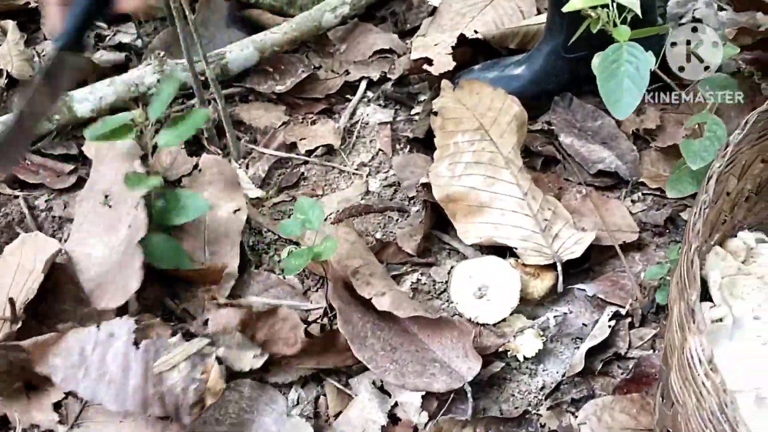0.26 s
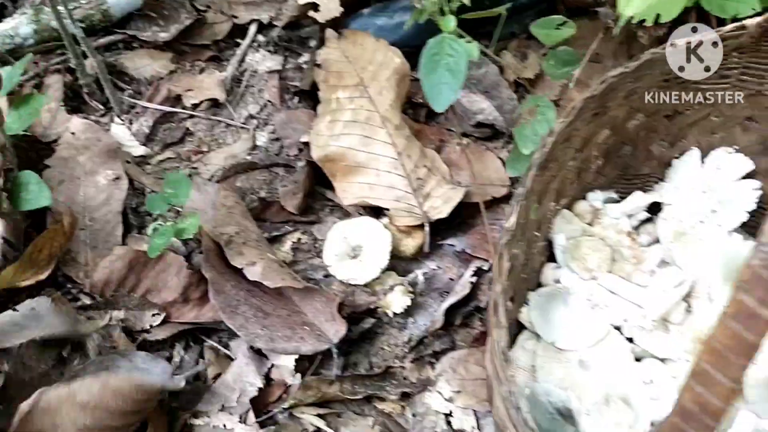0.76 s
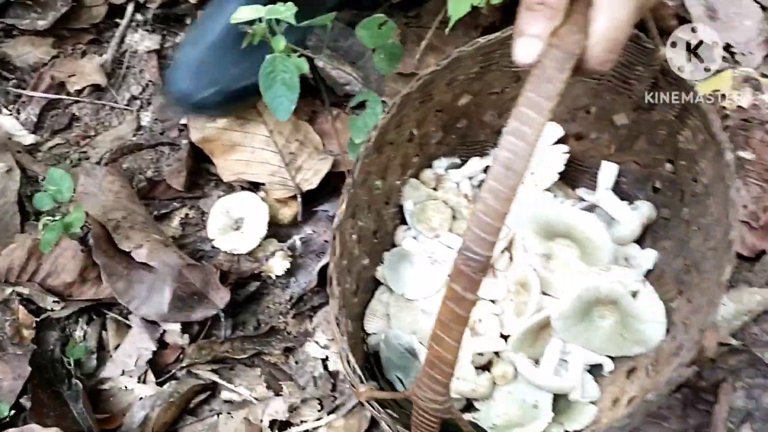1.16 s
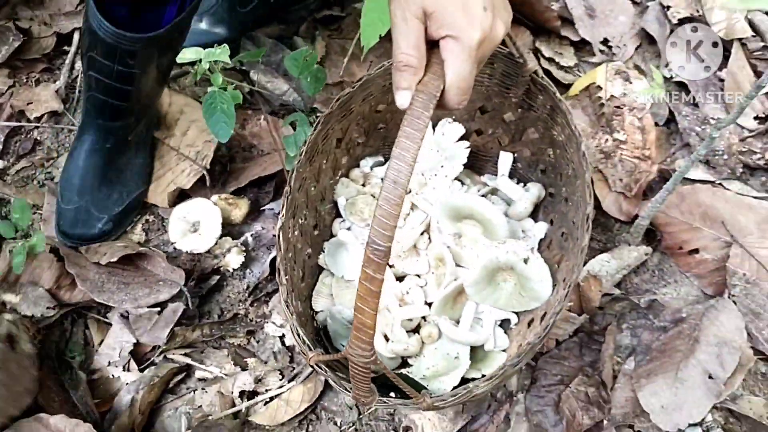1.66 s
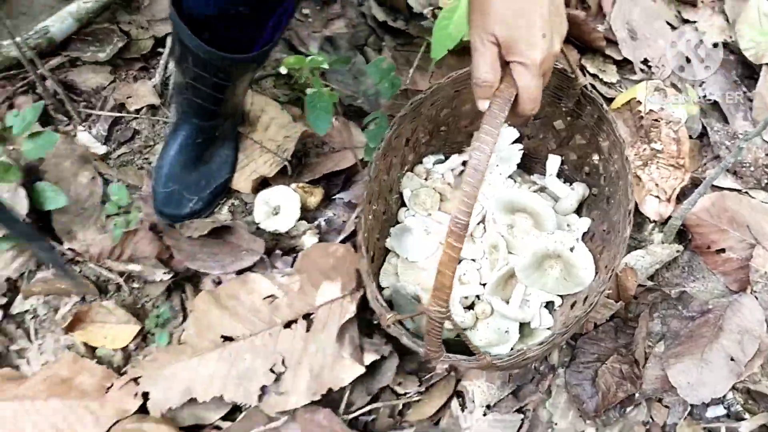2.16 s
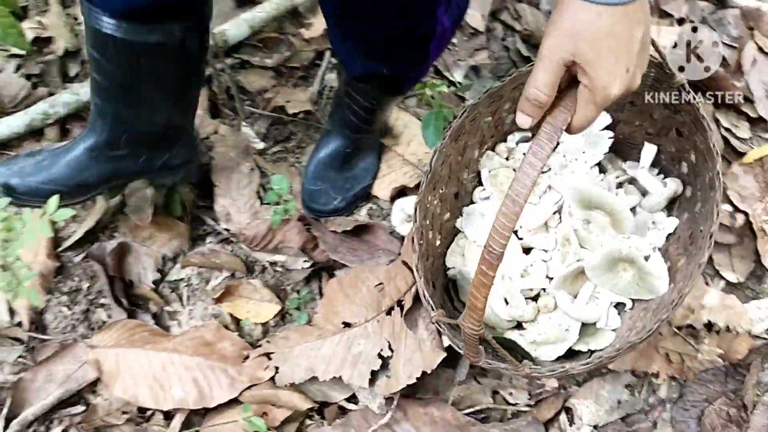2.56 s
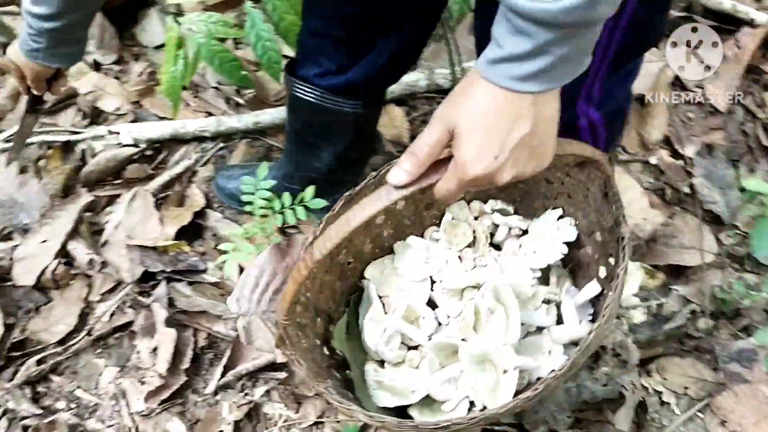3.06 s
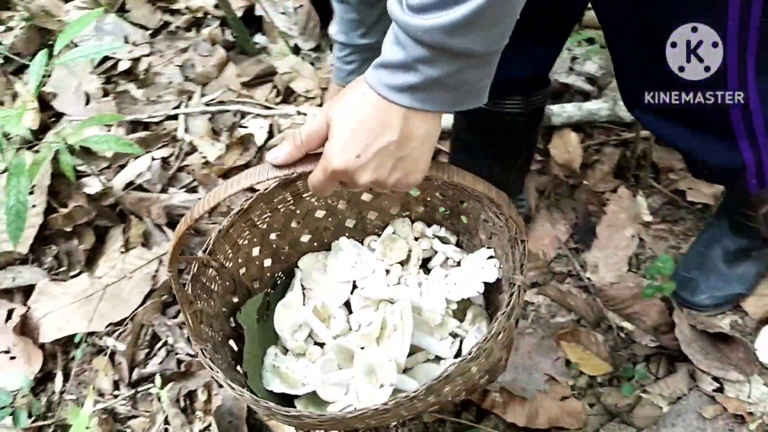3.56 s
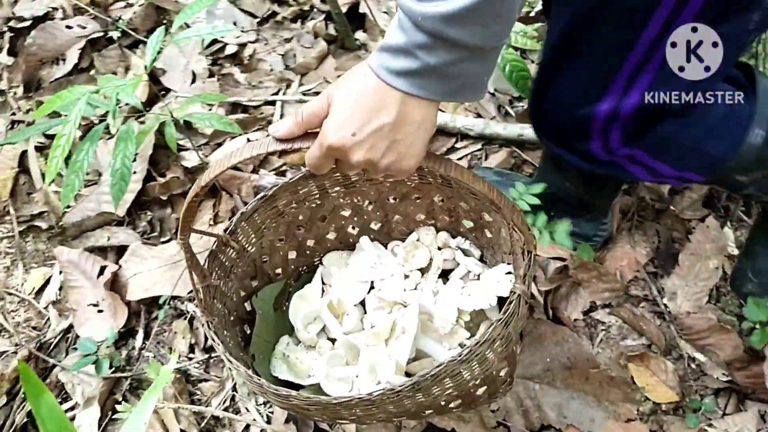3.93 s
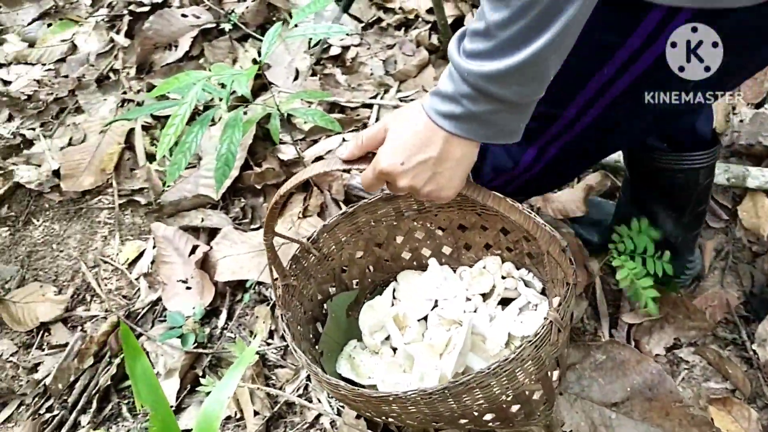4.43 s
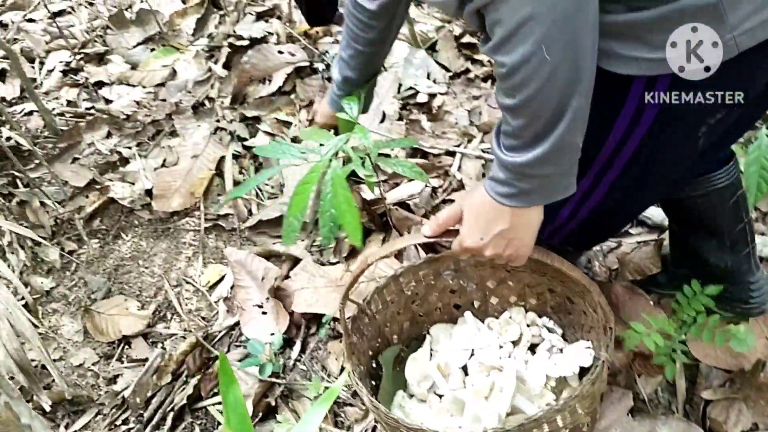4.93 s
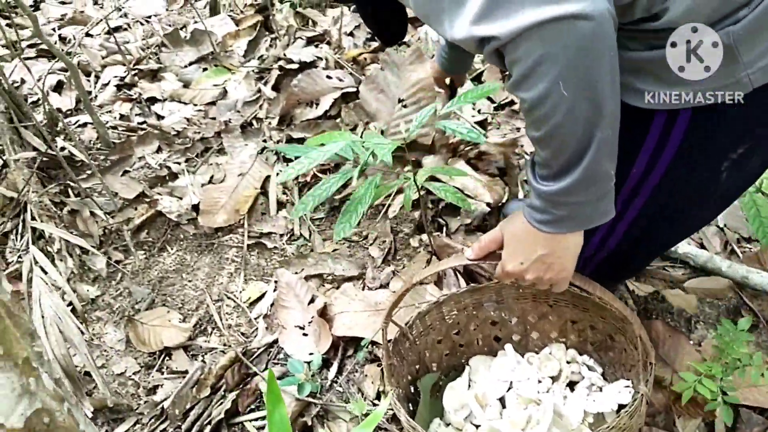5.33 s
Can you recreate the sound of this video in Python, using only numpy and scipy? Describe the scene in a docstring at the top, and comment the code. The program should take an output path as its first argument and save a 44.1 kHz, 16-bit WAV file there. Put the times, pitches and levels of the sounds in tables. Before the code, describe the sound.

Very near a handheld stereo microphone outdoors, a blade pushes through dry leaf litter in irregular bursts, densest around one second, with brittle crackle, scrapes and stalk snaps. A loud single snap comes near three seconds. Lighter rustles follow. High cicadas hiss behind, dropping later as a thin insect whistle grows clearer.

```python
"""A blade sweeps and digs through dry leaf litter, near and wandering between the ears. Each push sums damped
leaf fractures and shaped noise into crunch, tearing, pressed litter and crisp edges. Stalks snap as decaying
sines with noise splinters; scrapes are noise ringing around a gliding pitch. Behind it shaped noise makes a
cicada chorus and a faint forest murmur, and two insects whistle sine tones. The carried camera adds low
shudders, low bumps come from the camera and the heavier snaps, and the digging gets a short forest scatter."""
import sys
import numpy as np
from scipy import signal
from scipy.fft import rfft, irfft, next_fast_len
from scipy.io import wavfile
from scipy.ndimage import uniform_filter1d, map_coordinates

SR = 44100
rng = np.random.default_rng(int(sys.argv[2]) if len(sys.argv) > 2 else 0)


def master_out(mix):
    """Clip the mix to full scale and print it as 16-bit PCM to the path in sys.argv[1]."""
    frames = np.transpose(np.atleast_2d(mix))
    ceiling = np.clip(frames, -1, 1)
    pcm = np.round(ceiling * 32767).astype(np.int16)
    wavfile.write(sys.argv[1], SR, pcm)


N = 246413  # length in samples


def amp(db):
    """Decibels to gain."""
    return 10 ** (np.asarray(db) / 20)


def unit(x):
    """Scale to rms 1."""
    return x / np.sqrt(np.mean(x ** 2) + 1e-20)


def along(points, hz):
    """Read (f/Hz, value) points on a log frequency axis."""
    f, v = np.transpose(points)
    return np.interp(np.log(hz + 1), np.log(f), v)


def curves(rows):
    """One automation curve, a value per sample, for each column after the time."""
    s, *cols = np.transpose(rows)
    return [np.interp(np.arange(N) / SR, s, c) for c in cols]


def wobble(rate):
    """A smooth random curve with rate knots a second."""
    knots = rng.standard_normal(int(N * rate / SR) + 4)
    return map_coordinates(knots, [np.arange(N) * rate / SR])


def panned(db, pan_db):
    """Left and right gains around a level, pan_db apart."""
    return amp(db + np.array([[pan_db], [-pan_db]]) / 2)


def noise():
    """Two unrelated channels of white noise."""
    return rng.standard_normal((2, N))


def filtered(x, response):
    """Multiply the spectrum of x by a response of frequency."""
    m = next_fast_len(N + SR // 4)
    return irfft(rfft(x, m) * response(np.fft.rfftfreq(m, 1 / SR)), m)[..., :N]


def coloured(pair, spectrum, alike):
    """Two unrelated signals become a stereo sound of rms 1 with this spectrum and left-right likeness."""
    def mid_side(hz):
        turn = np.arccos(np.clip(along(alike, hz), -1, 1)) / 2
        return amp(along(spectrum, hz)) * [np.cos(turn), np.sin(turn)]
    mid, side = filtered(pair, mid_side)
    return unit(np.array([mid + side, mid - side]))


# colour of the forest murmur: f/Hz, relative level/dB per Hz
MURMUR_SPECTRUM = [(25, -16), (200, -7), (800, -3), (2000, 0), (6000, -28)]
MURMUR_DB = -68


def forest_murmur():
    """Faint steady noise, the air of the still forest."""
    return amp(MURMUR_DB) * coloured(noise(), MURMUR_SPECTRUM, LITTER_LIKENESS)


# chorus fader, before a fixed trim: t/s, level/dB
CHORUS_LEVEL = [(0, -39), (1.2, -38), (3.44, -37.5), (3.75, -45.5), (4.6, -47.5), (5.1, -53.5), (5.59, -50)]
# colour of the chorus ahead: f/Hz, relative level/dB per Hz
CICADA_SPECTRUM = [(2500, -50), (3600, -22), (4000, -5), (4300, 4), (4850, 0), (5500, 4), (6400, -5),
                   (7300, -4.5), (8500, 2), (9400, 0), (10300, -23.5), (15500, -13)]
# equaliser for the chorus off to the side: f/Hz, gain/dB
CHORUS_ASIDE = [(4000, -7), (5900, 5.5), (6700, -11), (7600, 1), (9400, 0.5), (10500, -9), (15500, -4)]
TURN_S, TURN_LENGTH_S = 3.4, 0.35  # the camera turns away from the chorus


def cicadas():
    """Many far cicadas merge into a hiss that fades and changes colour as the camera turns."""
    chorus_db, = curves(CHORUS_LEVEL)
    ahead = coloured(noise(), CICADA_SPECTRUM, [(4000, 0.0016), (9000, 0)])
    aside = filtered(ahead, lambda hz: amp(along(CHORUS_ASIDE, hz)))
    turn = np.clip((np.arange(N) / SR - TURN_S) / TURN_LENGTH_S, 0, 1)
    level = amp(chorus_db + 2.0 + wobble(24.94))
    return level * (ahead + turn * (aside - ahead))


WHISTLE_ROUGH_DB = 2.2  # depth of the random level flutter of both whistling insects
# the farther insect's single swell: start t/s, length t/s, level/dB before the swell, pitch f/Hz
FAR_SWELL = (2.95, .6, -48.5, 4253)


def far_whistle():
    """A farther insect, pitched a little higher, swells once out of the chorus and sinks back."""
    start, length, db, hz = FAR_SWELL
    t = np.arange(N) / SR
    swell = np.sin(np.pi * np.clip((t - start) / length, 0, 1))
    tone = np.array([np.sin(2 * np.pi * hz * t + .6 * wobble(25)) for ear in range(2)])
    return amp(db) * swell * unit(tone * amp(WHISTLE_ROUGH_DB * wobble(60)))


# swells of the held whistle: start t/s, length t/s, level/dB before a fixed trim, left minus right level/dB
WHISTLE_SWELLS = [(0.235, 0.14, -43, 2), (1.15, .12, -52, -2), (1.3, .11, -51, 2), (1.64, 0.07, -42, 3),
                  (2.06, .12, -47, -3), (2.25, .2, -42, 5), (2.57, .2, -47.5, 0),
                  (2.975, 0.065, -44.5, -12), (3.05, 0.13, -44.5, -14), (3.16, 0.125, -42.5, 4),
                  (3.52, .1, -48, 4), (3.805, 0.11, -42.5, -9), (3.95, 0.11, -40.5, -7),
                  (4.035, 0.115, -40.5, -10), (4.125, 0.125, -41, -8), (4.255, 0.05, -42, 0),
                  (4.31, 0.03, -46, 6), (4.41, 0.075, -40.5, -3), (4.51, 0.095, -43.5, -4),
                  (4.645, 0.125, -41, -6), (4.772, 0.058, -42, -6), (4.865, 0.06, -48, -9),
                  (4.945, 0.135, -42, -2), (5.06, 0.09, -40, -4), (5.13, 0.125, -38, -5),
                  (5.23, .12, -37, -5), (5.335, .09, -39.5, -6), (5.44, 0.14, -42.5, -3)]
WHISTLE_HZ, WHISTLE_DRIFT_HZ = 3893, 7
WHISTLE_TRIM_DB = -5.0
WHISTLE_FLOOR_DB = -52  # the level that the held tone fades to between swells, before the trim


def whistle():
    """One insect holds a continuous whistle that swells and fades, drifting in pitch and fluttering in level."""
    gain = np.full((2, N + SR), amp(WHISTLE_FLOOR_DB))
    for start, length, db, pan_db in WHISTLE_SWELLS:
        a, n = round(start * SR), round(length * SR)
        gain[:, a:a + n] += panned(db, pan_db) * signal.windows.tukey(n, .5)
    pitch_hz = WHISTLE_HZ + WHISTLE_DRIFT_HZ * wobble(3) + 9 * wobble(90)
    phase = 2 * np.pi * np.cumsum(pitch_hz) / SR
    # paths through the trees shift the whistle differently at each ear
    tone = np.array([np.sin(phase + .4 * wobble(8)) for ear in range(2)])
    fluttering = unit(tone * amp(WHISTLE_ROUGH_DB * wobble(110)))
    return gain[:, :N] * amp(WHISTLE_TRIM_DB) * fluttering


# colour of the shudder: f/Hz, relative level/dB per Hz
SHUDDER_SPECTRUM = [(20, -23), (45, -17), (80, 2), (115, 5), (200, -12), (600, -27), (2000, -50)]
# low bumps, some from the carried camera, some the body thuds of heavier snapping stalks: t/s, nominal
# level/dB, pitch f/Hz
BUMPS = [(.09, -49, 140), (.64, -46, 110), (0.919, -32, 129), (2.32, -47, 85), (2.44, -56, 90),
         (2.92, -46, 90), (3.02, -53, 85), (3.73, -50, 85), (4.137, -44, 115), (4.24, -43, 105),
         (4.303, -37, 110), (4.395, -39, 115), (4.475, -38, 108), (4.511, -44, 105), (5.389, -41, 111)]
RUMBLE_DB, SHAKE_DB = -74.5, -58  # nominal steady rumble; ground shake relative to the crunch gain


def handling(effort):
    """Dull shudders that grow with the digging, and decaying low bumps, both stronger on the right."""
    rumble = (amp(RUMBLE_DB) + amp(SHAKE_DB) * effort) * amp(2.3 * wobble(6.6))
    t = np.arange(SR // 6) / SR
    knocks, jolts = np.zeros((2, N + SR))
    for s, db, hz in BUMPS:
        start = round(s * SR)
        blow = amp(db) * (1 - np.exp(-t / 0.0086))
        knocks[start:][:len(t)] += blow * amp(2 - 60 * t / 0.068) * np.sin(2 * np.pi * hz * t)
        jolts[start:][:len(t)] += blow * amp(-12.5 - 60 * t / 0.16)
    shudder = (rumble + jolts[:N]) * coloured(noise(), SHUDDER_SPECTRUM, [(50, .1), (150, 0.2)])
    bumps = signal.sosfilt(signal.butter(2, 75, "high", fs=SR, output="sos"), knocks[:N])
    return shudder * amp([[-4], [2.5]]) + bumps * amp([[-1.5], [1.5]])


# decay of the forest scatter: f/Hz, t60 t/s
FOREST_DECAY = [(200, 0.055), (2000, 0.19), (12000, 0.052)]


def forest_scatter(x):
    """Trunks and ground answer with a short noise tail whose decay time depends on frequency."""
    hz, t, z = signal.stft(rng.standard_normal((2, SR // 4)), SR, nperseg=256)
    decay = amp(-60 * t / along(FOREST_DECAY, hz)[:, None])
    tail = signal.istft(z * decay, SR, nperseg=256)[1]
    return signal.fftconvolve(x, tail / np.linalg.norm(tail[0]), axes=1)[:, :N]


def turned(pair, delay_ms):
    """A sound off to one side reaches one ear earlier than the other."""
    n = np.arange(N)
    shift = delay_ms * SR / 2000  # half the delay in samples, later at the left and earlier at the right
    return np.array([map_coordinates(x, [n + side * shift], order=3) for x, side in zip(pair, (-1, 1))])


# the blade rubs along soil and stiff leaves:
# start t/s, end t/s, level/dB before the fades, first resonance f/Hz, last resonance f/Hz, width f/Hz
SCRAPE_GLIDES = [(0.04, 0.2, -42, 1400, 1200, 350), (0.83, 0.93, -37, 3600, 4200, 900),
                 (0.525, 0.69, -40, 760, 670, 200), (0.53, 0.66, -40, 2120, 2010, 260),
                 (0.65, 0.75, -35.5, 2030, 1920, 260), (0.62, 0.73, -39, 3750, 3350, 600),
                 (1.503, 1.76, -40, 2300, 2100, 400), (1.82, 2.0, -45, 1350, 1100, 300),
                 (3.555, 3.824, -42, 1080, 980, 300), (4.909, 5.243, -48, 780, 690, 222)]


def scrapes():
    """While the blade slides, its chatter excites one broad resonance that drifts as the contact moves."""
    out = np.zeros((2, N))
    for start, end, db, first_hz, last_hz, width_hz in SCRAPE_GLIDES:
        a, b = round(start * SR), min(round(end * SR), N)
        push = rng.standard_normal((3, b - a)) + 1j * rng.standard_normal((3, b - a))
        lowpass = signal.butter(2, width_hz / 2, fs=SR, output="sos")
        # one stream is common to both ears, one more belongs to each ear
        chatter = signal.sosfilt(lowpass, push[0] + 0.49 * push[1:])
        glide_hz = np.linspace(first_hz, last_hz, b - a)
        ring = np.real(chatter * np.exp(2j * np.pi * np.cumsum(glide_hz) / SR))
        out[:, a:b] += amp(db) * unit(ring) * signal.windows.tukey(b - a, .35)
    return out


# snapping stalks and twigs: t/s, nominal level/dB, pitch f/Hz, left minus right level/dB,
# ring t60 t/s, splinter level/dB relative to the snap before its colour
STALK_SNAPS = [(.142, -20, 1150, 0, .016, -12), (.216, -19, 980, -1, .01, -11),
               (.237, -20, 912, 0, .014, -12), (.472, -26, 1800, 1, .016, -11),
               (.516, -23, 654, 0, .016, -11), (.723, -13, 1900, 3, .012, -9),
               (.736, -10.5, 900, 0, .006, -6), (.801, -13, 1300, -1, .014, -10),
               (.842, -11.5, 2400, 0, .005, -7), (.848, -14, 1010, 1, .01, -10),
               (.859, -15, 3400, 0, .007, -8), (.876, -10.5, 3200, 1, .007, -6),
               (.8995, -8, 1090, 0, .009, -12), (.922, -9, 1190, 1, .014, -9),
               (.9232, -11.5, 2350, 0, .018, -8), (.931, -17, 1300, 0, .007, -9),
               (.973, -15, 1000, 0, .018, -18), (1.125, -28, 1200, 0, .008, -7),
               (1.289, -25, 1270, 1, .014, -9), (1.424, -19, 1400, 0, .02, -9),
               (1.486, -14, 1700, 1, .009, -6), (1.594, -20, 2000, 2, .008, -11),
               (1.618, -20, 2160, 1, .01, -11), (1.831, -16, 1280, 1, .02, -14),
               (1.87, -19, 1310, 0, .012, -9), (2.856, 0.5, 1950, 3, .0042, -9),
               (2.8585, -17, 1400, 1, .009, -14), (3.241, -23, 4260, -2, .02, -12),
               (3.495, -21, 1000, 3, .01, -10), (3.641, -16, 1080, 1, .018, -13),
               (3.824, -24, 1900, 1, .014, -8), (3.924, -26, 1170, 1, .01, -10),
               (4.104, -31, 1800, 1, .008, -8), (4.281, -24, 1100, 1, .014, -12),
               (4.374, -25, 1100, 1, .018, -15), (4.3835, -16, 2200, 4, .013, -9),
               (4.4045, -11.5, 1900, 0, .012, -9), (4.454, -26, 3900, 1, .006, -6),
               (4.49, -20.5, 1400, 3, .006, -13), (4.498, -8.5, 1850, 5, .0105, -20),
               (4.524, -15, 1500, 1, .011, -7), (4.538, -24, 915, 4, .02, -20),
               (4.565, -24, 1840, 3, .012, -13), (4.597, -27, 1327, 2, .018, -9),
               (4.615, -18, 1250, 2, .014, -7), (4.622, -21, 2000, 0, .012, -8),
               (4.729, -18, 2070, 3, .012, -7), (4.7485, -14, 4150, 3, .009, -5),
               (4.7495, -19, 1900, 2, .008, -12), (4.757, -12.5, 2100, 1, .009, -7),
               (4.764, -23, 1500, 1, .01, -10), (4.779, -25, 2600, 0, .007, -5),
               (4.825, -28, 1560, 2, .007, -9), (4.877, -32, 2050, 1, .016, -16)]
# equaliser for the splinters: f/Hz, gain/dB
SPLINTER_COLOUR = [(100, -35), (600, -16), (1500, 2), (4200, 2), (5400, -4), (6700, -13.5), (8600, 3.5),
                   (11000, -9.5), (15500, -14)]
SECOND_MODE, SECOND_MODE_DB = 1.46, -13  # a stalk's upper ring: ratio to its pitch, relative level
RATTLE_DB = -13  # the leaf that the stalk rattles, relative to the snap


def snaps():
    """A stalk gives way with a sharp pop and a spray of splinters, and rattles the leaf that lies on it."""
    pops, sprays = np.zeros((2, 2, N + SR))
    t = np.arange(SR // 12) / SR
    rise = 1 - np.exp(-t / 0.00025)
    for s, db, hz, pan_db, t60, splinter_db in STALK_SNAPS:
        gain = panned(db, pan_db) * rise
        swing = 2 * np.pi * hz * t + rng.normal(0, 0.45, (2, 1))  # a random phase at each ear
        modes = np.sin(swing) + amp(SECOND_MODE_DB) * np.sin(SECOND_MODE * swing)
        pop = modes * amp(-60 * t / t60)
        band = signal.butter(2, [hz * 0.2, min(hz * 2, SR / 3)], "band", fs=SR, output="sos")
        leaf = unit(signal.sosfilt(band, rng.standard_normal((2, len(t)))))
        # the leaf takes a millisecond or two to start rattling
        rattle = (1 - np.exp(-t / 0.0019)) * leaf * amp(-60 * t / (t60 + 0.0051))
        spray = rng.standard_normal((2, len(t))) * amp(splinter_db - 60 * t / (1.6 * t60))
        start = round(s * SR)
        pops[:, start:start + len(t)] += gain * (pop + amp(RATTLE_DB) * rattle)
        sprays[:, start:start + len(t)] += gain * spray
    # thin stalks radiate no bass
    thin = signal.sosfilt(signal.butter(2, 350, "high", fs=SR, output="sos"), pops[:, :N])
    return thin + filtered(sprays[:, :N], lambda hz: amp(along(SPLINTER_COLOUR, hz)))


def crackles(rate, pitch_hz, spread, cycles, scatter_db, rub_db, size=160):
    """Two streams of tiny leaf fractures, each a short damped ring, over the noise of leaves rubbing."""
    count = int(rate * N / SR)  # rate is in fractures a second
    when, strength, angle, chance = rng.random((count, 4)).T
    hz = np.clip(pitch_hz * np.exp(spread * (2 * chance - 1)), 100, SR / 2.2)
    turns = hz[:, None] * np.arange(size) / SR
    # most fractures are weak, a few are strong
    force = amp(-scatter_db * np.log(1 - .985 * strength)) * np.sqrt(hz)
    rings = force[:, None] * np.sin(2 * np.pi * turns) * np.exp(-turns / cycles)
    index = ((when * N).astype(int)[:, None] + np.arange(size)).ravel()
    pair = []
    for way in (np.cos, np.sin):
        share = way(2 * np.pi * angle)[:, None]
        pair.append(np.bincount(index, (rings * share).ravel(), N)[:N])
    # above its own pitch a fracture still carries a sharp edge
    edged = filtered(np.array(pair), lambda hz: np.sqrt(hz / pitch_hz))
    return unit(unit(edged) + amp(rub_db) * noise())


LEAF_COLOUR_DB, LEAF_WIDTH_HZ, LEAF_CONTACT_S = 1.9, 300, .05  # rms tint; smoothing over pitch and time


def leaf_by_leaf(pair):
    """Each leaf that the blade passes lends its own broad resonances, so the colour keeps shifting."""
    hz, t, z = signal.stft(pair, SR, nperseg=512)
    field = rng.standard_normal(z.shape[1:])
    for _ in range(2):
        field = uniform_filter1d(field, round(LEAF_WIDTH_HZ / hz[1]), axis=0)
        field = uniform_filter1d(field, round(LEAF_CONTACT_S / t[1]), axis=1)
    tint = unit(amp(LEAF_COLOUR_DB * unit(field)))
    return signal.istft(z * tint, SR, nperseg=512)[1][:, :N]


# pushes through the litter: start t/s, length t/s, nominal crunch level/dB halfway,
# swell over the push level/dB, then relative to the crunch: tearing level/dB, pressed litter level/dB,
# crisp edges level/dB; initial settling level/dB per s, delay of the left ear t/ms
PUSHES = [(-.01, 0.14, -36, 5.5, 1.5, -10.5, -14, 92, 0.21),
          (0.16, 0.075, -41.5, -2, 4.5, -8, -16, 74, 0.18), (0.309, 0.15, -43, 2, 2, -14.5, -12, 74, 0.17),
          (0.509, 0.078, -38, 4, -2.5, -12, -9.5, 74, 0.26),
          (0.604, 0.14, -32.5, 0.5, -2, -11.5, -7.5, 120, 0.31),
          (0.752, 0.052, -32.5, 5, 2, -11, -16, 120, 0.24),
          (0.809, 0.11, -29.5, 2, -3.5, -11.5, -12, 280, 0.18),
          (0.927, 0.038, -28, -1, -7, -9, -18, 110, 0.33), (1.016, 0.037, -35, 0, -11, -16, -12, 114, 0.18),
          (1.109, 0.057, -39, -11.5, -13, -12, -17, 230, 0.22),
          (1.276, 0.087, -40.5, 6, -4, -8.5, -20, 74, 0.25),
          (1.367, 0.065, -37.5, 5, 2, -9.5, -16, 260, 0.15),
          (1.472, 0.39, -34.5, 1.5, 1, -11.5, -12.5, 78, 0.32),
          (1.905, 0.19, -35.5, -3, -5, -12.5, -13.5, 117, 0.0045),
          (2.153, 0.21, -47.5, 8, 2, -23, -17, 74, -0.15),
          (2.378, 0.46, -38, 4, 1.5, -23.5, -10, 64, -0.12),
          (2.984, 0.092, -43, -1.5, -5, -37, -31, 110, -0.14),
          (3.143, 0.039, -52, -5, 2.5, -20, -24, 74, 0.1), (3.216, 0.18, -42.5, -1, 3, -19, -8, 74, 0.11),
          (3.333, 0.21, -39, 7, 1.5, -13, -10, 71, 0.13),
          (3.602, 0.16, -34.5, 4, 2, -14.5, -17, 102, -0.076),
          (3.82, 0.11, -43.5, 2, 2.5, -12.5, -31, 90, -0.16),
          (3.978, 0.065, -49.5, 0.5, 2.5, -12, -30, 74, -0.078),
          (4.203, 0.034, -44, 1, -1, -17, -17, 74, -0.13),
          (4.246, 0.061, -38, -2.5, 0, -9.5, -25, 108, -0.065),
          (4.35, 0.059, -37, -1, 2, -14, -29, 250, -0.19),
          (4.419, 0.29, -41, -1, 2, -11.5, -31, 100, -0.26),
          (4.578, 0.038, -40, -4, 7, -7, -38, 150, -0.18),
          (4.638, 0.14, -40.5, 2, 1.5, -12.5, -13, 111, -0.23),
          (4.851, 0.29, -45, 9, 5, -13, -10, 74, -0.056), (5.078, .28, -38.5, 13, 1, -7, -16.5, 66, -0.037),
          (5.423, 0.09, -39.5, 8, 2.5, -10.5, -10.5, 68, -0.04)]
BITE_S, SETTLE_SPEEDUP_S = 0.019, 0.3  # the blade bites; the leaves settle after the push, ever faster


def pushes():
    """Gains of the four litter layers: each push bites, swells as leaves pile up, then dies away."""
    power = np.zeros((4, N))
    for start, length, db, swell_db, tearing_db, pressed_db, crisp_db, settle_db_per_s, _ in PUSHES:
        t = np.maximum(np.arange(N) / SR - start, 0)
        after = np.maximum(t - length, 0)
        push_db = db + swell_db * (np.minimum(t / length, 1) - .5)
        settle_db = settle_db_per_s * after * (1 + after / SETTLE_SPEEDUP_S)
        gain = np.minimum(t / BITE_S, 1) * amp(push_db - np.minimum(settle_db, 120))
        power += (amp([[0], [tearing_db], [pressed_db], [crisp_db]]) * gain) ** 2
    return np.sqrt(power)


# colours of the litter layers, each: f/Hz, relative level/dB per Hz
CRUNCH_SPECTRUM = [(100, -82), (300, -9), (480, -3.5), (680, -1.5), (900, 2), (1150, 0.5), (1500, -3.5),
                   (2000, -4.5), (2800, -19), (4200, -12), (6700, -38), (16000, -52)]
BRITTLE_SPECTRUM = [(200, -47), (700, 5), (1300, 2), (2200, -3), (3000, -8), (4400, 0), (6700, -18),
                    (8600, -9), (15500, -26)]
TEARING_SPECTRUM = [(700, -39), (1400, 2.5), (2100, 2), (2600, 0.5), (3000, -4), (3600, -1.5), (4200, -2.5),
                    (5300, -9), (6700, -26), (8600, -9.5), (12000, -8.5), (16000, -49)]
PRESSED_SPECTRUM = [(25, -64), (70, -34), (105, -17), (150, -5), (210, -0.5), (280, 2.5), (420, -2),
                    (800, -23), (2000, -60)]
CRISP_SPECTRUM = [(1000, -24), (2500, 3), (4200, 1), (5300, -4.5), (6700, -10), (8800, 0.5), (10500, -2),
                  (12500, -6.5), (15500, -19)]
# stereo width of the litter, also used by the murmur: f/Hz, left-right likeness (1 = mono)
LITTER_LIKENESS = [(100, 0.98), (500, 0.95), (1100, 0.76), (1800, 0.34), (3200, 0.2), (5000, 0.34),
                   (12000, 0.07)]
BRITTLE_DB = -6.5  # stiff leaf ribs breaking, relative to the crunch gain


def litter(gains):
    """The blade catches and slips: leaves break and tear, ribs crack, the layer beneath is pressed, edges sizzle."""
    crunch_gain, tearing_gain, pressed_gain, crisp_gain = gains
    catch = wobble(130) + .7 * wobble(40)
    breaking = crackles(rate=1500, pitch_hz=1019, spread=0.79, cycles=1.3, scatter_db=3.0, rub_db=7.0)
    crunch = crunch_gain * amp(-3.5 + 0.99 * catch) * coloured(breaking, CRUNCH_SPECTRUM, LITTER_LIKENESS)
    ribs = crackles(rate=420, pitch_hz=2200, spread=.9, cycles=1.1, scatter_db=3, rub_db=-40)
    brittle = crunch_gain * amp(BRITTLE_DB) * coloured(ribs, BRITTLE_SPECTRUM, LITTER_LIKENESS)
    ripping = crackles(rate=1300, pitch_hz=2800, spread=0.765, cycles=3.5, scatter_db=3.2, rub_db=0)
    torn = coloured(ripping, TEARING_SPECTRUM, LITTER_LIKENESS)
    tearing = tearing_gain * amp(-1.33 + 0.27 * catch) * torn
    pressing = coloured(noise(), PRESSED_SPECTRUM, LITTER_LIKENESS)
    pressed = pressed_gain * amp(-3.5 + 1.7 * catch) * pressing
    edges = crackles(rate=2200, pitch_hz=6500, spread=.9, cycles=1.2, scatter_db=2.5, rub_db=-1, size=64)
    crisp = crisp_gain * amp(8.0 + 0.55 * catch) * coloured(edges, CRISP_SPECTRUM, LITTER_LIKENESS)
    return leaf_by_leaf(crunch + tearing + pressed) + brittle + crisp


def scene():
    """Near digging, wandering from side to side with the blade, in front of the insects and the still forest."""
    gains = pushes()
    delay_ms, = curves([(start + length / 2, ms) for start, length, *_, ms in PUSHES])
    digging = turned(litter(gains) + snaps(), delay_ms) + scrapes()
    background = forest_murmur() + cicadas() + far_whistle() + whistle()
    return background + handling(gains[0]) + amp(-12.5) * forest_scatter(digging) + digging


# the two microphone ports differ in colour: f/Hz, left minus right level/dB
PORT_COLOUR = [(200, 0), (550, -1.5), (900, 0), (1300, 1.8), (1900, 2), (2600, -4), (3300, 0), (4400, 1),
               (8500, 0), (10000, -3.5), (12000, 0)]
TOP_HZ = 15650  # band limit


def record(dry):
    """Each port colours the sound, and the camera keeps nothing above its band limit."""
    heard = filtered(dry, lambda hz: amp(along(PORT_COLOUR, hz) * np.array([[1], [-1]]) / 2))
    return filtered(heard, lambda hz: hz < TOP_HZ)


dry = scene()
out = record(dry)
master_out(out)
```